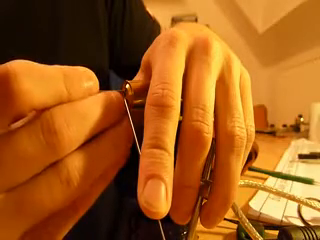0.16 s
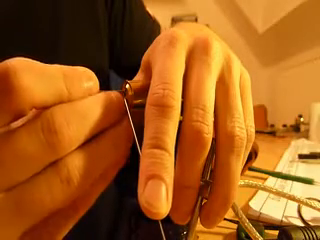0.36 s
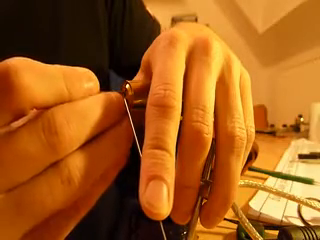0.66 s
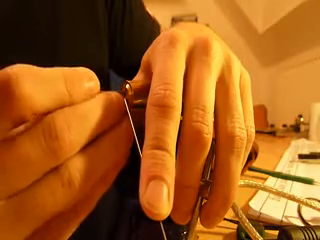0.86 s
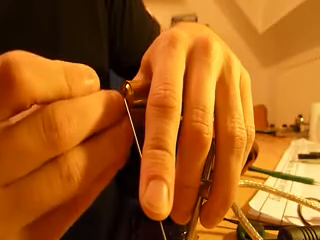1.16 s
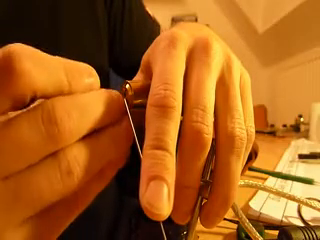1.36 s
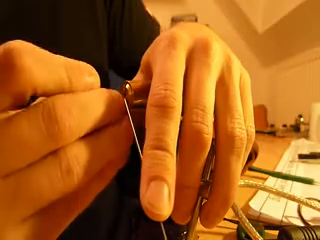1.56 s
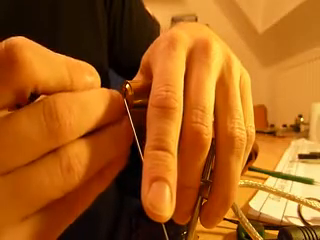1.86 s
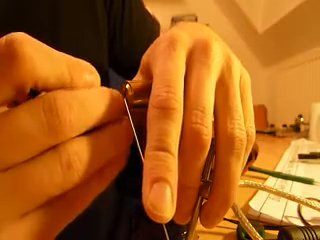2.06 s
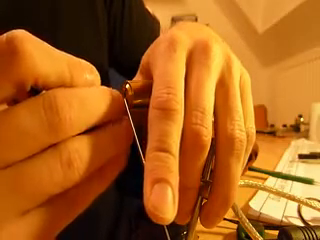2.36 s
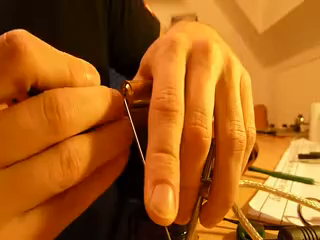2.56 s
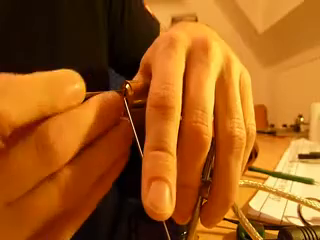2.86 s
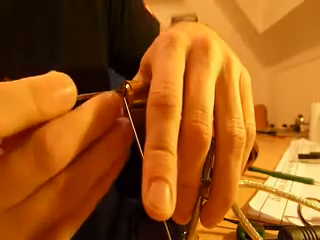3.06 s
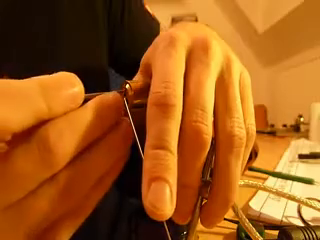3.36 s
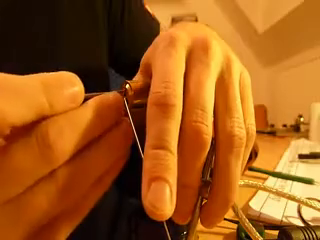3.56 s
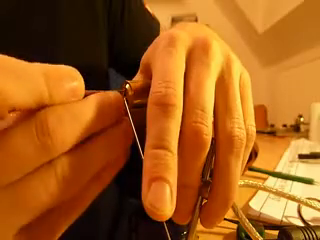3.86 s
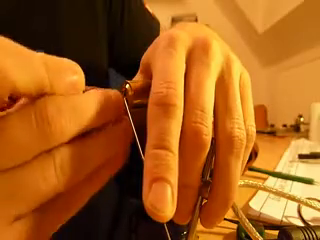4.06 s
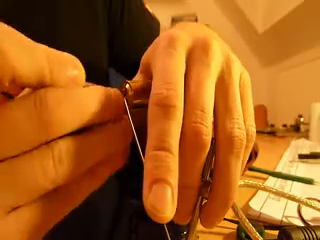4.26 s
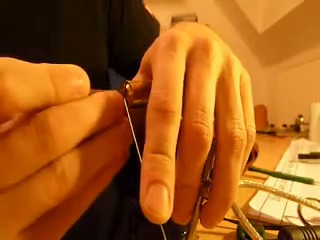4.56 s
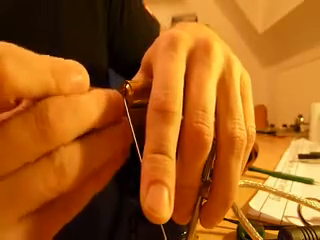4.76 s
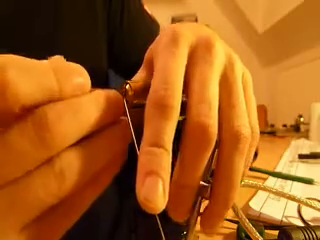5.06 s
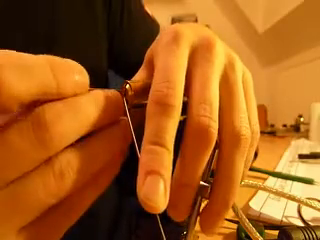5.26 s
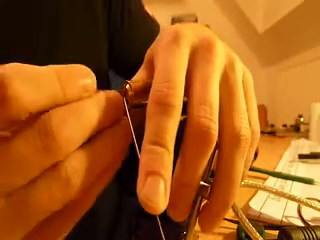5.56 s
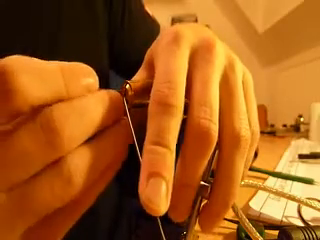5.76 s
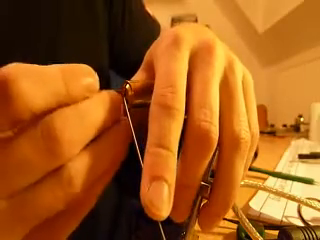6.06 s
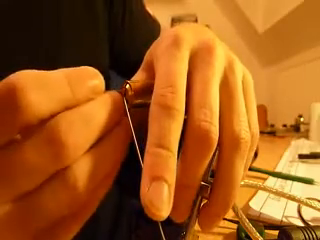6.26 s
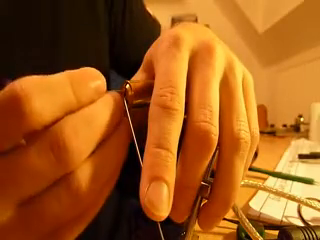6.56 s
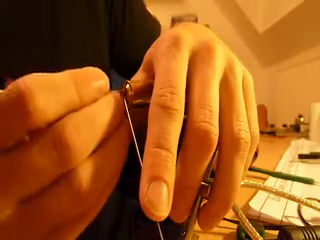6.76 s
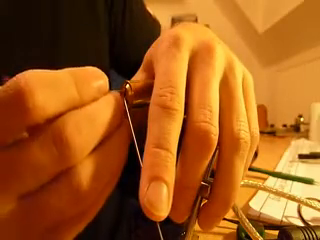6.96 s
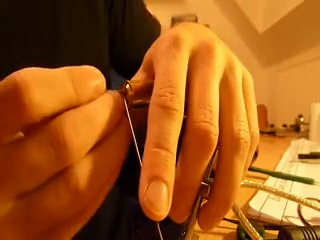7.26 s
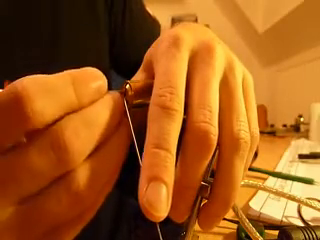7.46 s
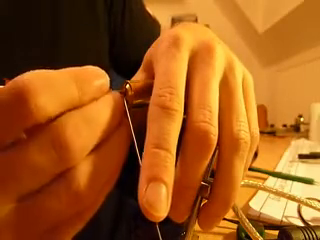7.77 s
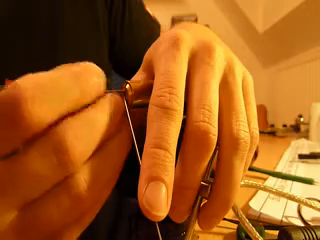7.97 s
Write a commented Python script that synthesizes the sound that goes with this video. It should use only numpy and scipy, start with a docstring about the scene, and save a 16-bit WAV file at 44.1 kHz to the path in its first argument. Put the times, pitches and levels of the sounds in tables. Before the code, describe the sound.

A pick works the pins of a lock, making irregular metal clicks and two sharper snaps over a steady hiss.

```python
"""In a small room, close up, a pick works the pins of a hand-held lock cylinder.
Steel clicks on the pins and rings the lock; twice a pin snaps free and lands on its seat.
The hands give dull thumps, and tiny dry ticks fall in between. Under it lies a steady hiss
with a low hum and faint whines; gain control ducks everything after the hardest snaps."""
import sys
import numpy as np
from scipy import signal
from scipy.fft import rfft, irfft
from scipy.io import wavfile

SR = 44100
rng = np.random.default_rng(int(sys.argv[2]) if len(sys.argv) > 2 else 0)


def materialize(psi):
    """Save the field psi as 16-bit PCM at rate SR to the path in sys.argv[1].

    A 1-D psi becomes a single channel; in a 2-D psi each row is a channel.
    """
    bounded = np.clip(np.atleast_2d(psi).T, -1, 1)
    quanta = np.round(bounded * 32767).astype(np.int16)
    wavfile.write(sys.argv[1], SR, quanta)


N = 358533

# a pin snaps free under the pick: (time [s], level [dB], crack centre [Hz], crack width [octaves])
PIN_SNAPS = [(0.5669, -25.5, 690, 0.52), (4.1570, -20.5, 1036, 0.26)]


def pin_snaps(ring, landing_s=0.001546, landing_db=-3.5):
    """A pin breaks free with a hard crack, then lands on its seat with a thin, high clack."""
    out = np.zeros(N)
    for s, db, hz, octaves in PIN_SNAPS:
        add(out, s, contact(db, hz, octaves, ring, ring_db=2, rasp_db=1))
        clack = contact(db + landing_db, centre_hz=4330, octaves=0.084, ring=ring, ring_db=-14, rasp_db=-8)
        add(out, s + landing_s, clack)
    return out


def pick_clicks(ring, middling_hz=2000):
    """The pick touches a pin: a harder contact is brighter and broader, with more ring and rasp."""
    # touches of the pick: (time [s], level [dB], crack centre [Hz])
    touches = [(0.5611, -36, 1960), (0.9890, -36, 2780), (2.398, -40.5, 2480), (2.4020, -40.5, 1820),
               (2.7684, -51, 2800), (3.0702, -39, 1600), (3.0743, -32, 1310), (3.9170, -51, 2540),
               (4.9163, -45, 1390), (5.0692, -43, 1200), (5.812, -43, 1490), (5.8467, -43.5, 800),
               (5.8590, -43, 950), (7.1429, -30, 2310), (7.8314, -42.5, 1450), (7.8520, -45, 690),
               (8.0858, -43.5, 1800), (8.1140, -44, 2130), (8.1210, -36, 2020)]
    out = np.zeros(N)
    for s, db, hz in touches:
        hardness = np.log2(hz / middling_hz)
        octaves = 0.5 * 2 ** (0.41 * hardness)
        ring_db = -11.5 + 12 * hardness
        rasp_db = -6.5 + 15.5 * hardness
        add(out, s, contact(db, hz, octaves, ring, ring_db, rasp_db))
    return out


def contact(db, centre_hz, octaves, ring, ring_db, rasp_db, grit=0.043, grit_s=0.0026, size=4096):
    """Steel meets a pin: a short, gritty crack, with ring and rasp at levels set against it."""
    t, hz = np.arange(size) / SR, np.fft.rfftfreq(size, 1 / SR)
    # the briefer the contact, the higher its spectrum is centred
    band = np.exp(-0.5 * (np.log2((hz + 1) / centre_hz) / octaves) ** 2)
    skirt = amp(-29) * hz / (hz + 200) / (1 + (hz / 4500) ** 2)
    crack = level_hit(pulse(band + skirt))
    # one full blow, then a few milliseconds of tiny ones
    slip = grit * rng.standard_normal(size) * np.exp(-t / grit_s)
    slip[0] = 1
    out = amp(ring_db) * ring
    add(out, 0, signal.fftconvolve(crack, slip))
    add(out, 0, amp(rasp_db) * rasp())
    return amp(db) * out


def lock_ring(rise_s=0.0012):
    """After a blow the lock rings briefly, damped by the fingers; the steel tools ring faintly on."""
    # modes of the lock, then of the tools: (frequency [Hz], level [dB], t60 [s])
    modes = [(720, -25, 0.026), (1040, -20, 0.033), (1723, -9.5, 0.027), (2530, -10, 0.024),
             (3460, -10, 0.024), (3786, 1.5, .018), (3970, -7, 0.02), (5470, -18, 0.01), (5770, -15, 0.015),
             (6630, -12.5, 0.0086), (724, -22.5, 0.24), (1090, -45, 0.34), (2490, -30, 0.15),
             (3630, -30, 0.21), (3500, -30, 0.23), (4590, -41, 0.25)]
    t = np.arange(SR // 2) / SR
    ring = sum((-1) ** k * amp(db - 60 * t / t60) * np.sin(2 * np.pi * hz * t)
               for k, (hz, db, t60) in enumerate(modes))
    return level_hit(ring * (1 - np.exp(-t / rise_s)))


def rasp(slip_s=0.00091, fade_s=0.013, size=4096):
    """Steel slips over a pin for a few milliseconds: a burst of random grain and set colour."""
    # spectrum of the slip: (frequency [Hz], level [dB])
    colour = [(60, -22), (250, -8), (900, 3.5), (2000, 0), (2900, -9), (3800, 3), (5200, 0), (7200, -17.5),
              (10300, -20), (12000, -35)]
    t, hz = np.arange(size) / SR, np.fft.rfftfreq(size, 1 / SR)
    burst = rng.standard_normal(size) * t * np.exp(-t / slip_s)
    phase = np.angle(rfft(burst))
    scrape = irfft(amp(curve(colour, hz)) * np.exp(1j * phase))
    return level_hit(scrape * np.exp(-t / fade_s))


def hand_thumps(thump_hz=123.8, rise_s=0.012, boom_hz=132, boom_t60=0.96, nudges_per_grip=4):
    """A push of the hand swells and dies in a few cycles, and leaves a low room mode booming."""
    # single pushes on the lock: (time [s], level [dB])
    pushes = [(0.982, -50.5), (3.078, -39.5), (3.913, -40.5), (3.985, -47), (4.918, -44), (5.820, -40.5),
              (5.932, -44), (8.086, -41.5)]
    # the fingers shift their grip in small nudges: (start [s], end [s], nudge level [dB])
    grips = [(2.879, 2.95, -47), (3.261, 3.428, -52), (4.572, 4.776, -51.5), (5.577, 5.716, -49),
             (6.626, 6.79, -47), (7.662, 7.87, -47.5)]
    t, out = np.arange(SR // 2) / SR, np.zeros(N)
    swell = t / rise_s * np.exp(1 - t / rise_s)
    phase = 2 * np.pi * thump_hz * t
    body = np.sin(phase) + amp(-9) * np.sin(0.736 * phase)
    boom = amp(-13 - 60 * t / boom_t60) * (1 - np.exp(-t / rise_s)) * np.sin(2 * np.pi * boom_hz * t)
    thump = swell * body + boom
    jolts = [(s + 0.0074, db - 12.5) for s, db, _, _ in PIN_SNAPS]  # each snap reaches the hands
    nudges = [(start + (end - start) * (k + rng.random()) / nudges_per_grip, db)
              for start, end, db in grips for k in range(nudges_per_grip)]
    for s, db in [*pushes, *jolts, *nudges]:
        add(out, s, amp(db) * thump)
    return out


def dry_ticks(per_s=20, faint_db=-56, spread_db=4.0, cap_db=-45, size=256):
    """Thin, dry ticks: a few clear ones in a random scatter of faint ones."""
    # the clear ticks: (time [s], level [dB])
    clear_ticks = [(1.283, -43), (1.4223, -43), (4.1656, -20), (4.2125, -38), (5.374, -44), (7.0470, -45),
                   (7.6511, -45)]
    # spectrum of a tick: (frequency [Hz], level [dB])
    colour = [(300, -7), (2000, -14), (5000, -1), (8000, 4), (11000, -8)]
    tick = pulse(amp(curve(colour, np.fft.rfftfreq(size, 1 / SR))))
    level_db = np.minimum(faint_db + spread_db * rng.exponential(1, N), cap_db)
    train = (rng.random(N) < per_s / SR) * amp(level_db)
    for s, db in clear_ticks:
        add(train, s, amp([db]))
    return signal.oaconvolve(train, tick / abs(tick).max())[:N]


def small_room(x, wet_db=-3, wall_s=0.019, spread_s=0.002, early_gain=0.59, size=256):
    """Direct sound, close echoes and a short tail that swells as the walls answer; the bass lingers."""
    # the room's tail: (frequency [Hz], level [dB], t60 [s])
    bands = [(144, 8.5, 0.4), (450, 9, 0.2), (900, -6, 0.2), (1980, 4.5, 0.22), (4100, -7.5, .22),
             (6040, -9, 0.28), (10000, -3, 0.2)]
    # bounces off hands and desk: (delay [s], gain [ratio])
    echoes = [(.0013, -0.019), (.0031, -0.35), (.0054, 0.4), (.0066, -0.061), (0.0114, .13), (0.0179, 0.14)]
    hz, t, noise = signal.stft(rng.standard_normal(SR // 2), SR, nperseg=size)
    t60 = curve(bands, hz, column=2)[:, None]
    fade = amp(curve(bands, hz)[:, None] - 60 * t / t60)
    tail = signal.istft(noise * fade, SR, nperseg=size)[1]
    age = np.arange(len(tail)) / SR
    tail *= early_gain + (1 - early_gain) * (1 + np.tanh((age - wall_s) / spread_s)) / 2
    response = amp(wet_db) * tail / np.linalg.norm(tail)
    response[0] = 1  # direct sound
    for delay, gain in echoes:
        add(response, delay, np.array([gain]))
    return signal.oaconvolve(x, response)[:N]


def room_tone(hiss_db=-50.82):
    """A bed of even hiss; narrow bands of noise make a low hum and a few wavering whines."""
    # spectrum of the hiss: (frequency [Hz], level [dB])
    colour = [(20, -9), (35, -13.5), (65, -7.5), (110, 0), (300, 0.5), (600, -1), (1000, -4.5), (1600, -7),
              (2600, -7.5), (3900, -13.5), (4900, -16.5), (6000, -21.5), (7200, -34), (10500, -37)]
    # the hum, then the whines: (centre [Hz], width [Hz], level [dB])
    whines = [(91.8, 10.3, -62), (1265.5, 7.6, -65.5), (1844, 85, -64), (1916, 49, -66.5), (2260, 33, -72),
              (2430, 19, -82), (2664, 7.6, -72.5), (4720, 220, -74.5)]
    hz = np.fft.rfftfreq(N, 1 / SR)
    hiss = irfft(rfft(rng.standard_normal(N)) * amp(curve(colour, hz)), N)
    out = amp(hiss_db) * unit(hiss)
    white = rfft(rng.standard_normal(N))
    for centre_hz, width_hz, db in whines:
        peak = 1 / (1 + (2 * (hz - centre_hz) / width_hz) ** 2)
        out += amp(db) * unit(irfft(white * peak, N))
    return out


def amp(db):
    """Decibels to gain."""
    return 10 ** (np.asarray(db) / 20)


def unit(x):
    """Scales to rms 1."""
    return x / np.sqrt(np.mean(x ** 2) + 1e-20)


def level_hit(x, size=128):
    """Scales a hit to the energy of 3 ms at rms 1."""
    return x * np.sqrt(size / np.sum(x ** 2))


def curve(points, hz, column=1):
    """One column of a table, joined by straight lines over log frequency."""
    columns = np.transpose(points)
    return np.interp(np.log(hz + 1), np.log(columns[0] + 1), columns[column])


def pulse(gain):
    """The shortest causal pulse that has this spectrum."""
    log_gain = np.log(np.maximum(np.r_[gain, gain[-2:0:-1]], 1e-5))
    return np.fft.ifft(np.exp(np.conj(signal.hilbert(log_gain)))).real


def add(mix, s, sound):
    """Lays a sound into the mix at s seconds."""
    part = mix[max(round(s * SR), 0):][:len(sound)]
    part += sound[:len(part)]


def scene(pins_db=-2):
    """Snaps and clicks in the room, with thumps and ticks, over the room tone; mono."""
    ring = lock_ring()
    low_cut = signal.butter(2, 110, "high", fs=SR, output="sos")  # a small lock radiates little bass
    pins = signal.sosfilt(low_cut, pin_snaps(ring) + pick_clicks(ring))
    return (amp(pins_db) * small_room(pins) + hand_thumps() + dry_ticks() + room_tone())[None]


def record(dry, threshold_db=-36, slope=0.17, recover_db_per_s=1.5, sense_s=0.021, top_hz=11450):
    """Gain control ducks quickly on a loud snap and creeps back; a low-pass trims the top."""
    pole = np.exp(-1 / (sense_s * SR))
    power_db = 10 * np.log10(signal.lfilter([1 - pole], [1, -pole], dry[0] ** 2) + 1e-12)
    over_db = np.maximum(power_db - threshold_db, 0)
    recovery_db = np.arange(N) / SR * recover_db_per_s
    duck_db = np.maximum.accumulate(slope * over_db + recovery_db) - recovery_db
    low_pass = signal.firwin(101, top_hz, window=("kaiser", 8), fs=SR)
    return signal.oaconvolve(dry * amp(-duck_db), low_pass[None], "same")


dry = scene()
out = record(dry)
materialize(out)
```